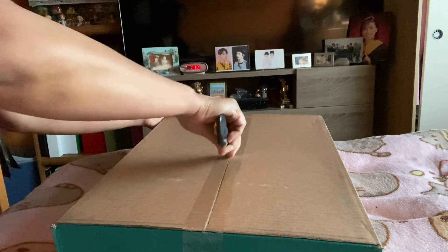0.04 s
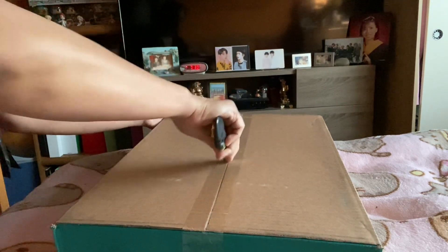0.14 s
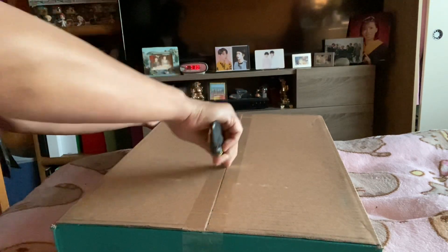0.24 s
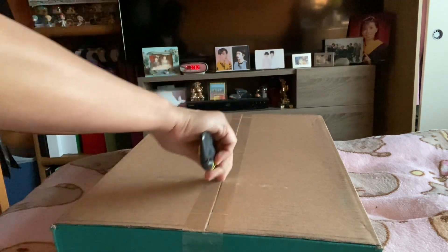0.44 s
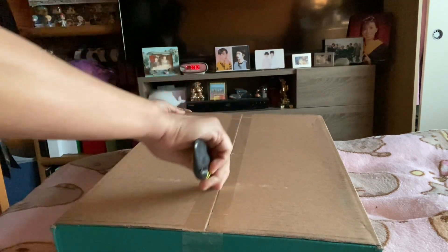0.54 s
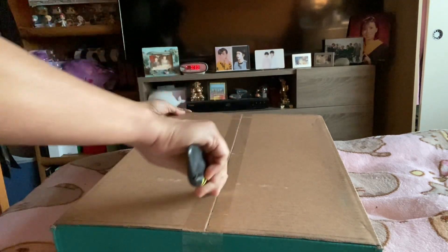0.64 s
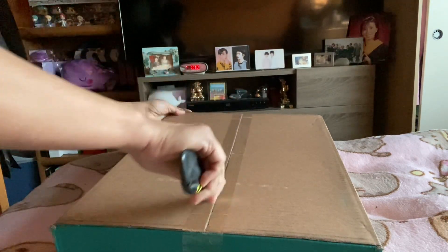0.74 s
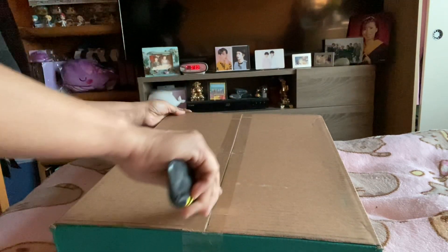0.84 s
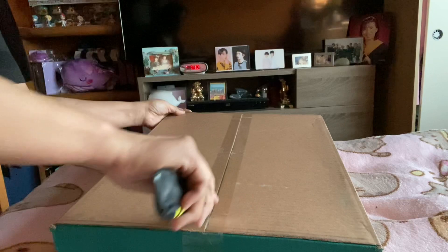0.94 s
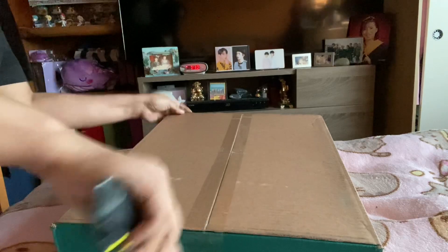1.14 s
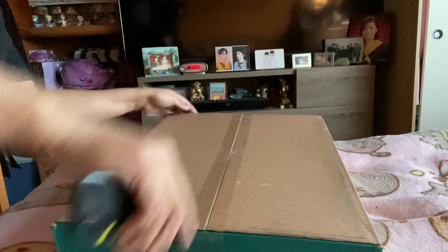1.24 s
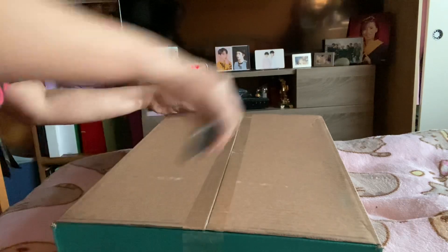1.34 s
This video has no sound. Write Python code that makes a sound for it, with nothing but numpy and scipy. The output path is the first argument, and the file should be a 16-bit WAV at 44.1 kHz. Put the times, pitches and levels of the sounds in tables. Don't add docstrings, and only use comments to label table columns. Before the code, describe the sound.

A box cutter blade scrapes along a taped cardboard box, then rips free with a sharp snap

```python
import sys
import numpy as np
from scipy import signal
from scipy.fft import rfft, irfft
from scipy.io import wavfile
from scipy.ndimage import uniform_filter1d

SR = 44100
rng = np.random.default_rng(int(sys.argv[2]) if len(sys.argv) > 2 else 0)


def int16_out(signal):
    q = np.round(np.clip(np.atleast_2d(signal).T, -1, 1) * 32767)
    wavfile.write(sys.argv[1], SR, q.astype(np.int16))


def gain_from_db(level_db):
    decades = np.asarray(level_db, float) / 20
    return 10 ** decades


N = 61739
TIME_S = np.arange(N) / SR
LEFT_RIGHT = np.array([[1], [-1]])


def rms_one(x):
    return x / np.sqrt(np.mean(x ** 2) + 1e-20)


def in_time(rows):
    s, *columns = np.transpose(rows)
    return [np.interp(TIME_S, s, c) for c in columns]


def at_hz(points, hz):
    point_hz, value = np.array(points).T
    return np.interp(np.log(hz), np.log(point_hz), value)


def drift(rate_hz):
    r = np.exp(-2 * np.pi * rate_hz / SR)
    wander = signal.lfilter([1], [1, -2 * r, r * r], rng.standard_normal(N + SR))
    return rms_one(wander[SR:])


def quick_drift(rate_hz):
    shake = drift(rate_hz)
    return shake - uniform_filter1d(shake, size=SR // 20)


def ring(clicks, hz, t60):
    r = gain_from_db(-60 / (t60 * SR))
    w = 2 * np.pi * hz / SR
    return signal.lfilter([0, np.sin(w)], [1, -2 * r * np.cos(w), r * r], clicks + 1e-18)


def grains(per_s, spread_db):
    happens = rng.random(N) < per_s / SR
    size = np.minimum(rng.exponential(1, N), 4)
    return happens * gain_from_db(spread_db * size) * rng.choice([-1, 1], N)


# pitch_hz, likeness (1 = the same)
LIKENESS = [(60, 1), (240, -0.43), (950, 0.71), (3770, 0.31), (15000, -1.2)]


def colour(white, spectrum, flutter_db):
    out = 0
    edges = 30 * 2 ** (np.arange(28) / 3)
    flicker = [drift(9.2) for _ in range(4)]
    for k, (low, high) in enumerate(zip(edges, edges[1:])):
        band = signal.butter(2, [low, high], "band", fs=SR, output="sos")
        mid, side = signal.sosfilt(band, white[k % 2])
        hz = np.sqrt(low * high)
        alike = np.clip(at_hz(LIKENESS, hz), 0, 1)
        level = gain_from_db(at_hz(spectrum, hz) + flutter_db * flicker[k % 4])
        out = out + level * (np.sqrt(1 + alike) * mid + np.sqrt(1 - alike) * side * LEFT_RIGHT)
    return rms_one(out)


# pitch_hz, level_db
AIR = [(24, -35.5), (40, -2), (630, -8.5), (2980, -21), (3930, -16.5), (4340, -24), (16000, -18.5)]


def room_air():
    return gain_from_db(-63) * colour(rng.standard_normal((2, 2, N)), AIR, flutter_db=10.0)


def body(clicks, modes, focus_hz=None):
    rung = []
    for k, (hz, db, t60) in enumerate(modes):
        if focus_hz is not None:
            db = db - 8.0 * np.log2(hz / focus_hz) ** 2
        level = gain_from_db(db + 0.9 * drift(3.7))
        rung.append((-1) ** k * level * rms_one(ring(clicks, hz, t60)))
    rung = np.array(rung)
    mode_hz = np.array(modes)[:, 0]
    reach = np.sqrt(np.clip(1 - at_hz(LIKENESS, mode_hz), 0, 1)) * (-1) ** (np.arange(len(modes)) // 2)
    mid = rung.sum(axis=0)
    side = reach @ np.roll(rung, 12, axis=1)
    return (mid + gain_from_db(-22.5) * side * LEFT_RIGHT) / np.std(mid)


# start_s, level_db, box_weight_db, edge_bite_db,
# pitch_hz (panels under the blade)
DRAG = [(0.0, -54.5, 5.5, -18, 535), (0.12, -57, 3, -6.5, 626), (0.196, -58.5, 3.5, -12.5, 577),
        (0.22, -48.5, -3, -9.5, 560), (0.28, -38.5, -10.5, -17, 535), (0.334, -42, -6, -11, 540),
        (0.41, -43, -3, -9, 766), (0.48, -43.5, -0.5, -12.5, 615), (0.64, -42.5, -2.5, -16, 680),
        (0.798, -42.5, -3.5, -12, 625), (0.884, -38, -9, -17.5, 483), (0.912, -41, -4.5, -10.5, 622),
        (0.982, -41.5, 2, -15.5, 482), (1.046, -50.5, 6.5, -18, 454), (1.068, -41, -7, -6.5, 418),
        (1.108, -74, 16.5, 8, 417), (1.2, -85, -4, -11, 652)]
# centre_s, change_db, half_width_s
SKIPS = [
    (0.234, -7, 0.0064),
    (.272, -12, 0.0042),
    (.397, 2.5, 0.0041),
    (0.584, -6, 0.0086),
    (0.625, -3, 0.0065),
    (0.679, -6, .004),
    (.714, -13, 0.0061),
    (0.984, -2.5, 0.012),
]
# pitch_hz, level_db, t60_s
BOX = [(59.8, -4.5, 0.096), (108.7, -2, 0.13), (156.5, 0, 0.071), (185.7, 3, 0.08), (306.3, -3, 0.034),
       (390, 4, 0.081), (461.4, 2, 0.067), (490.4, 2.5, 0.025), (573.7, 1.5, 0.039), (633, 1, 0.034),
       (767, 2, 0.048), (820, 1.5, 0.045), (908.4, 2.5, 0.053), (943.4, 3, 0.095)]
# pitch_hz, level_db
BOARD = [(1060, 2.5), (1260, 5), (1420, 6.5), (1700, 4), (2090, 3.5), (2500, 4), (3000, 1.5), (3560, -1.5)]


def scrape():
    level_db, weight_db, bite_db, focus_hz = in_time(DRAG)
    judder = gain_from_db(1.0 * quick_drift(70))
    for s, change_db, width in SKIPS:
        judder = judder * gain_from_db(change_db * np.exp(-((TIME_S - s + width / 2) / width) ** 2))
    heavy, slips, fine = (judder * grains(3000, 1.0) for _ in range(3))
    board = [(hz, db, 22 / hz) for hz, db in BOARD]
    large_panels = gain_from_db(weight_db) * body(heavy, BOX[:5])
    small_panels = body(slips, BOX[5:] + board[:3], focus_hz)
    biting_edge = gain_from_db(bite_db + 2.0) * body(slips + fine, board[3:])
    fade = np.clip((1.25 - TIME_S) / 0.052, 0, 1)
    return fade * gain_from_db(level_db) * (large_panels + small_panels + biting_edge)


# start_s, level_db
TAPE = [(0, -61.5), (.12, -59.5), (.2, -60), (.238, -50.5), (.26, -55.5), (.4, -55.5), (.5, -56.5),
        (.66, -55.5), (.83, -54), (.88, -46.5), (.94, -45.5), (.972, -40.5), (.995, -47.5), (1.045, -47),
        (1.075, -52.5), (1.2, -56), (1.235, -70), (1.265, -73), (1.285, -55.5), (1.4, -75)]
# pitch_hz, level_db
TAPE_COLOUR = [(1000, -7.5), (2000, -6), (3500, -2.5), (6000, -2.5), (8000, -2), (11500, -5.5),
               (14000, -2.5), (17000, -10)]


def tape():
    level_db, = in_time(TAPE)
    white = np.array([[grains(9000, 1.1) for _ in range(2)] for _ in range(2)])
    flutter_db = 1.0 * quick_drift(54.0)
    return gain_from_db(level_db + flutter_db) * colour(white, TAPE_COLOUR, flutter_db=2.4)


# start_s, level_db, pitch_hz (panel), t60_s, contact_s
KNOCKS = [(.2115, -40, 700, .04, .0005), (.2385, -34, 450, .04, .0008), (.2495, -33, 690, .05, .0006),
          (.2205, -29, 140, .07, .004), (.274, -33, 700, .04, .0007), (1.0535, -39, 900, .04, .0005),
          (1.0585, -35, 570, .04, .001), (1.0605, -34, 900, .03, .0005), (1.076, -29, 260, .03, .002),
          (1.0825, -31, 118, .08, .004), (1.0995, -36, 105, .1, .005), (1.084, -34, 480, .04, .001),
          (1.085, -34, 205, .06, .003), (1.352, -57, 290, .04, .002), (1.386, -58, 100, .1, .005)]


def knocks():
    out = np.zeros(N)
    for s, db, hz, t60, contact in KNOCKS:
        phase = np.clip((TIME_S - s) / contact, 0, 1)
        rung = ring(np.sin(np.pi * phase) ** 2, hz, t60)
        out += gain_from_db(db) * rung / np.abs(rung).max()
    return out


# start_s, level_db, pitch_hz, length_s
CATCHES = [(.305, -39.5, 626, 0.0072), (.336, -38.5, 586, 0.01), (.36, -49, 930, 0.021),
           (.42, -42, 928, .015), (.494, -40.5, 784, 0.0086), (.548, -40, 385, 0.013),
           (.551, -45, 850, 0.0086), (.6, -37.5, 736, 0.016), (.605, -39.5, 190, 0.013),
           (.63, -40, 770, 0.015), (.648, -40.5, 208, 0.016), (0.66, -37, 745, 0.017),
           (.694, -34, 750, 0.0068), (.721, -38, 585, .015), (.752, -37.5, 582, 0.014),
           (.758, -41.5, 771, 0.02), (.78, -34.5, 726, 0.02), (.782, -37.5, 594, 0.018),
           (.812, -39.5, 549, 0.025), (.842, -36, 530, 0.014), (0.8674, -38, 388, 0.022),
           (0.884, -39, 585, 0.015), (.9, -41, 163, 0.016), (.94, -46.5, 1022, 0.028),
           (.955, -40.5, 298, 0.013), (.975, -44.5, 1140, 0.01), (1.062, -30, 403, 0.0081)]


def catches():
    out = np.zeros(N)
    for s, db, hz, length in CATCHES:
        t = np.maximum(TIME_S - s, 0)
        rise = np.sin(np.pi / 2 * np.minimum(2 * t / length, 1))
        decay = gain_from_db(-60 * np.maximum(t - length, 0) / 0.024)
        out += gain_from_db(db) * rise * decay * np.sin(2 * np.pi * hz * t)
    return out


# start_s, level_db
RIP_TICKS = [
    (1.0582, -35),
    (1.0597, -28.5),
    (1.0612, -34.5),
    (1.0628, -30),
    (1.0665, -36),
]
# pitch_hz, level_db, t60_s
BLADE = [(1830, -14, 0.0082), (3010, -13.5, .03), (3565, -9, 0.048), (4360, -2, 0.015), (5000, -5, 0.015),
         (5920, 0, 0.019), (6500, -5.5, 0.023), (7740, -6.5, 0.0048), (9200, 6, .004),
         (11280, -1.5, 0.0071), (12900, -1.5, 0.0065), (15200, 6, .003)]


def rip():
    rise_s, hold_s, t60_s = 0.031, 0.0024, 0.035
    t = TIME_S - 1.0575
    swell = gain_from_db(15 * t / rise_s - 12)
    decay = gain_from_db(-60 * np.maximum(t - hold_s, 0) / t60_s)
    clicks = gain_from_db(-43.5) * np.where(t < 0, swell, decay) * grains(4700, 2.3)
    for s, db in RIP_TICKS:
        clicks[int(s * SR)] += gain_from_db(db)
    dulling_db = -899.5 * np.clip(t, 0, .02)
    out = np.zeros(N)
    for k, (hz, db, t60) in enumerate(BLADE):
        out += (-1) ** k * gain_from_db(db) * ring(clicks * gain_from_db(dulling_db * np.log2(hz / 4500)), hz, t60)
    return out


# pitch_hz, level_db, t60_s
CASING = [(1300, -26, .008), (1960, -24, .008), (2530, -27, .008), (3020, -24, .035), (8250, -21, .006),
          (11400, -16, .004), (13300, -20, .003), (9300, -7, .003), (15300, -14, .003), (4050, -7, .006),
          (4350, -5, .011), (4650, -2, .007), (5000, -6, .009), (5500, 0, .008), (6215, -1, .016),
          (6700, -14, .006)]


def struck(clicks, tilt_db):
    rung = []
    for hz, db, t60 in CASING:
        rung.append(gain_from_db(db + tilt_db * np.log2(hz / 5000)) * ring(clicks, hz, t60))
    rung = np.array(rung)
    core_band = signal.butter(6, [3900, 6800], "band", fs=SR, output="sos")
    core = signal.sosfilt(core_band, rung[9:].sum(axis=0))
    return core + (-1) ** np.arange(9) @ rung[:9]


# start_s, peak_db, brightness_db_per_octave
SNAPS = [
    (1.0880, -30, 24),
    (1.0904, -22, 24),
    (1.09080, -3.2, 0),
    (1.0941, -24, 1),
    (1.0988, -27, -4),
    (1.1105, -38, 12),
]


def snaps():
    out = np.zeros(N)
    for s, peak_db, tilt_db in SNAPS:
        click = 1.0 * (np.arange(N) == int(s * SR))
        snap = struck(click, tilt_db)
        out += gain_from_db(peak_db) * snap / np.abs(snap).max()
    return out


# pitch_hz, level_db, double_t60_s (each rings for half this)
AFTER_RING = [(2010, -16, .1), (2800, -9, .1), (3030, -1, .13), (3300, -5, .1), (3570, -4, .12),
              (4790, -8, .1), (5300, -8, .1), (6170, 0, .16), (6400, -5, .14), (6800, -7, .1),
              (7300, -10, .1), (8220, -16, .1)]


def after_ring():
    t = TIME_S - SNAPS[2][0]
    decay = (t > 0) * gain_from_db(-60 * np.maximum(t, 0) / .14)
    rattle = decay * np.array([grains(3400, 2.3) for _ in range(2)])
    rattle = rattle + 0.68 * rattle[::-1]
    return gain_from_db(-58) * sum(gain_from_db(db) * ring(rattle, hz, t60 / 2) for hz, db, t60 in AFTER_RING)


def room(x):
    t60_s, gap_s, low_hz = 0.21, .006, 400
    t = np.arange(SR // 2) / SR
    tail = rng.standard_normal((2, len(t))) * gain_from_db(-60 * t / t60_s) * (t > gap_s)
    no_lows = signal.butter(1, low_hz, "high", fs=SR, output="sos")
    tail = signal.sosfilt(no_lows, tail + 0.25 * tail[::-1])
    tail = tail / np.sqrt(np.sum(tail ** 2) / 2)
    return signal.fftconvolve(x[None], tail, axes=1)[:, :N]


def scene():
    cutter = rip() + snaps()
    thuds = knocks() + catches()
    drag = scrape()
    near = drag + thuds
    left_lag_s = .00009
    near[0] = np.interp(np.arange(N) - left_lag_s * SR, np.arange(N), near[0])
    panned = gain_from_db(1.3 * LEFT_RIGHT) * [cutter, np.roll(cutter, 1)]
    air = room_air()
    into_room = gain_from_db(-4) * cutter + thuds + gain_from_db(3.5) * drag.mean(axis=0)
    return near + panned + gain_from_db(-11.5) * room(into_room) + tape() + air + after_ring()


def roll_off(x):
    return signal.sosfilt(signal.butter(12, 16510, fs=SR, output="sos"), x)


# pitch_hz, level_db
SUM_PASSES = [(30, -14), (70, 0), (8100, 0), (8600, -17), (9800, -17), (10200, 0), (13500, 0), (14000, -19),
              (15900, -19), (16200, -45)]
# pitch_hz, level_db
DIFFERENCE_PASSES = [(30, -20), (70, 4), (10700, 0.5), (11300, -30), (12600, -29), (13200, 2),
                     (15400, -6.5), (16300, -27.5), (16500, -51)]


def record(dry):
    hz = np.maximum(np.fft.rfftfreq(N, 1 / SR), 1)
    both = irfft(rfft(dry[0] + dry[1]) * gain_from_db(at_hz(SUM_PASSES, hz)), N) / 2
    apart = irfft(rfft(dry[0] - dry[1]) * gain_from_db(at_hz(DIFFERENCE_PASSES, hz)), N) / 2
    return roll_off(np.array([both + apart, both - apart]))


dry = scene()
out = record(dry)
int16_out(out)
```